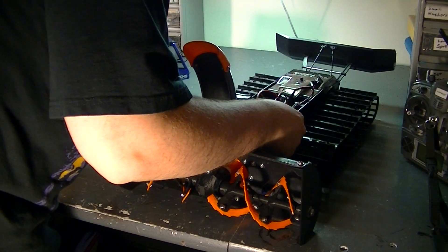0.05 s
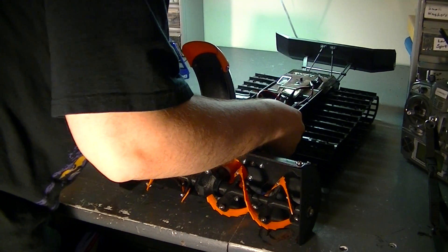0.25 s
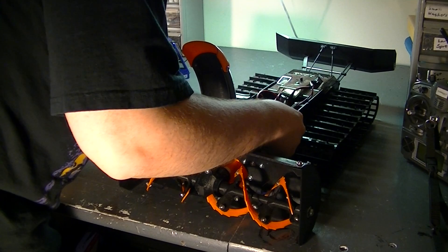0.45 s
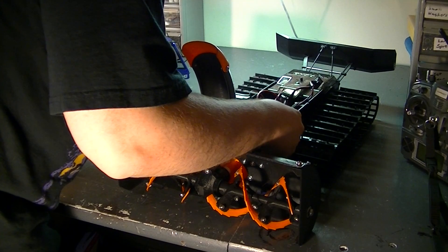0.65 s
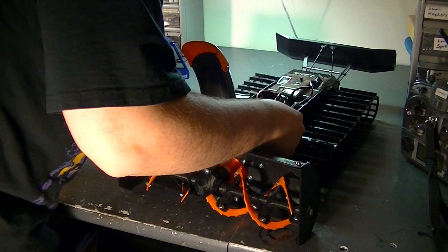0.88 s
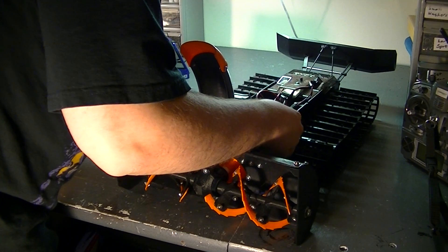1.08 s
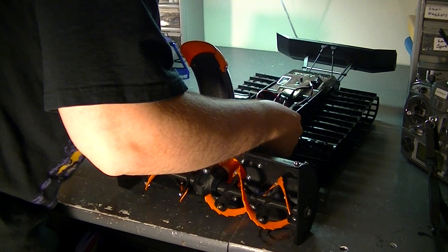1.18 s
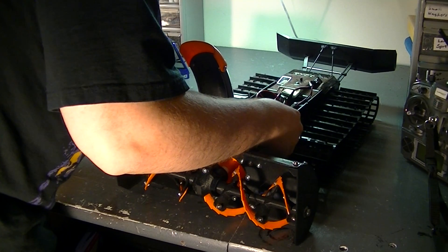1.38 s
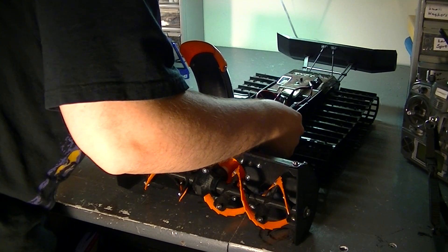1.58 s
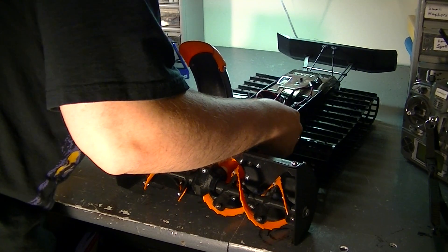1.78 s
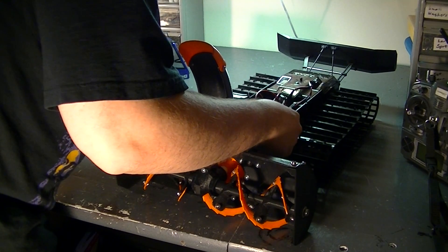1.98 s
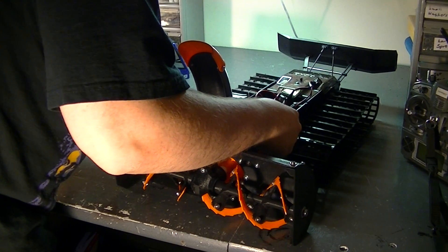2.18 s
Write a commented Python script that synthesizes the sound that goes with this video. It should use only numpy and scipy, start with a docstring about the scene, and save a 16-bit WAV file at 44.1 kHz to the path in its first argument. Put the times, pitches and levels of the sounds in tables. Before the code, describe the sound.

Sharp metallic ratchet clicks run for about two seconds, roughly five a second, as a small model machine is turned by hand. Each cracks and rings briefly. A loud one lands at 0.2 seconds, then they weaken until the other loud snap at 1.4 seconds, followed by softer ones. Between them, loose parts tick lightly and the model knocks faintly on the workbench, over low, quiet room tone.

```python
"""Sharp metallic ratchet snaps, about five a second and uneven in force, in a quiet room. They come from a
small metal model machine turned by hand on a workbench: each snap cracks, rings the frame, bounces off the
bench and dies in the room. Between the snaps, light ticks sound and the model knocks faintly on the bench, over
a low bed of room tone."""
import sys
import numpy as np
from scipy import signal
from scipy.fft import rfft, irfft
from scipy.io import wavfile
from scipy.ndimage import uniform_filter1d

SR = 44100
rng = np.random.default_rng(int(sys.argv[2]) if len(sys.argv) > 2 else 0)


def to_wav(s):
    """Save 16-bit WAV."""
    ch = np.atleast_2d(s).T  # columns
    pcm = np.round(np.clip(ch, -1, 1) * 32767)  # PCM
    wavfile.write(sys.argv[1], SR, pcm.astype(np.int16))


N = 99225
RING_S, LEAD_S = 0.6, 0.1  # length of each hit with its tail; pre-roll before time zero
BUILD_S = 0.0026  # time constant of the ringing as it spreads through the frame


def undb(db):
    """Decibels to gain."""
    return 10 ** (np.asarray(db) / 20)


def decay(t, t60):
    """An exponential tail that falls 60 dB in t60 seconds."""
    return np.exp(-np.log(1000) * t / t60)


def curve(hz, points, column=1):
    """A column of a table, read on a log-frequency axis."""
    table = np.array(points, float)
    return np.interp(np.log(np.maximum(hz, 1)), np.log(table[:, 0]), table[:, column])


def colour(x, points, size=4096):
    """Minimum-phase EQ through points of (frequency [Hz], gain [dB])."""
    cepstrum = irfft(curve(np.fft.rfftfreq(size, 1 / SR), points) * np.log(10) / 20)
    cepstrum[1:size // 2] *= 2  # folded forward, so nothing rings ahead of an attack
    cepstrum[size // 2 + 1:] = 0
    impulse = irfft(np.exp(rfft(cepstrum)))
    return signal.fftconvolve(x, impulse[None], axes=1)[:, :x.shape[1]]


def shelves(x, treble_db, bass_db=0):
    """Bass and treble shelves: a harder contact is brighter, a softer one duller."""
    return colour(x, [(594, bass_db), (1080, 0), (2120, 0), (7000, treble_db)])


def noise(size, side_db=-17.5, side_top_hz=6500):
    """White noise in a narrow stereo image, narrower still in the treble."""
    mid, side = rng.standard_normal((2, size))
    side = signal.lfilter(*signal.butter(1, side_top_hz, fs=SR), side)
    return mid + undb(side_db) * side * np.array([[1], [-1]])


def dense_ring(t, table, bands=40):
    """Countless close modes: noise in which each band dies at its own rate."""
    hz = np.fft.rfftfreq(len(t), 1 / SR)
    spectrum = rfft(noise(len(t))) * undb(curve(hz, table))
    centres_hz = np.geomspace(100, 16000, bands)
    ring = 0
    for centre, weights in zip(centres_hz, np.eye(bands)):
        band = irfft(spectrum * np.interp(hz, centres_hz, weights), len(t))
        ring += band * decay(t, curve(centre, table, column=2))
    return ring


def add(out, x, start):
    """Mix a sound in at its start time, allowing for the pre-roll."""
    i = max(int((start + LEAD_S) * SR), 0)
    out[:, i:i + x.shape[1]] += x[:, :out.shape[1] - i]


def room_tone(size, level_db=-55.5, waver_db=2.08, waver_samples=4000):
    """A low bed of room noise whose level wavers slightly."""
    # tone of the room's air (frequency [Hz], relative level [dB])
    air_spectrum = [(15, -49), (25, -12), (80, -15.5), (157, -1.5), (344, -2.5), (476, -7.5), (695, -6.5),
                    (754, -3), (1070, -5), (1610, -13), (2110, -9), (2610, -14.5), (3520, -19), (4740, -21),
                    (7110, -27), (14000, -35.5), (16000, -42)]
    air = colour(noise(size), air_spectrum)
    waver = uniform_filter1d(rng.standard_normal(size), waver_samples)
    waver = uniform_filter1d(waver, waver_samples)
    return air / air.std() * undb(level_db + waver_db * waver / waver.std())


def bench_knock(t, hz, t60, rattle_db=-2.5, width_hz=306, rise_s=0.0011):
    """A soft contact with the bench rings one low mode, with a little rattle around it."""
    edges_hz = [max(hz - width_hz / 2, 20), hz + width_hz / 2]
    rattle = signal.sosfilt(signal.butter(2, edges_hz, "band", fs=SR, output="sos"), noise(len(t)))
    ring = np.sin(2 * np.pi * hz * t) + undb(rattle_db) * rattle / rattle.std()
    return ring * (1 - np.exp(-t / rise_s)) * decay(t, t60)


def light_tick(t, crack_db=-4, crack_s=0.0012):
    """A light tick: a brief crack and a short ring."""
    # ring of a light tap (frequency [Hz], level [dB], t60 [s])
    tap_ring = [(150, -56, 0.2), (350, -43.5, 0.25), (580, -33.5, 0.14), (1060, -29, 0.1), (1470, -39, .12),
                (1960, -40, 0.11), (3940, -46.5, 0.13), (8900, -56.5, 0.075), (15000, -80, 0.092)]
    return dense_ring(t, tap_ring, bands=8) * (1 + undb(crack_db) * np.exp(-t / crack_s))


def metal_ring(t):
    """The few modes of the metal parts that sing on after a snap."""
    # lasting modes (frequency [Hz], level [dB], t60 [s])
    modes = [(765.4, -39.5, 0.26), (831, -35.5, 0.21), (946.3, -24, 0.1), (1015, -33.5, 0.22),
             (1286, -31.5, .2), (1486, -39.5, 0.12), (1782, -28, 0.19), (1808, -35, 0.36),
             (2060, -30, 0.21), (2057, -34.5, 0.16), (2216, -37.5, 0.23), (2600, -30, 0.093),
             (3109, -43, 0.28), (3982, -36, 0.15)]
    phases = rng.uniform(0, 2 * np.pi, len(modes))
    ring = sum(undb(db) * np.sin(2 * np.pi * hz * t + phase) * decay(t, t60)
               for (hz, db, t60), phase in zip(modes, phases))
    return (1 - np.exp(-t / BUILD_S)) * ring


def frame_hit(t):
    """The body of a snap: an impact by three short paths, then the ringing frame and the room."""
    # direct path, then bounces off the bench and the housing (delay [s], level [dB], treble [dB])
    paths = [(.0001, -13, -11), (.0015, -2.5, -16.5), (.00245, -2, -14)]
    # tone of the impact (frequency [Hz], gain [dB])
    impact_spectrum = [(100, -24), (450, -10.5), (680, -3.5), (980, 18.5), (1250, 10), (1550, -0.5),
                       (2100, 16), (2700, 10.5), (4400, 6), (7000, 3), (10000, -9), (15000, -32)]
    # dense ringing of the frame (frequency [Hz], level [dB], t60 [s])
    frame_ring = [(120, -52, 0.14), (333, -41, 0.37), (570, -30.5, 0.28), (860, -18.5, 0.17),
                  (1070, -15, 0.097), (1400, -18.5, 0.22), (1790, -14, 0.2), (2180, -4, 0.048),
                  (2430, -12.5, 0.11), (4300, -26.5, 0.15), (7400, -30, .16), (9260, -37.5, 0.18),
                  (15000, -53, 0.14)]
    # reverb of the room (frequency [Hz], level [dB], t60 [s])
    room_reverb = [(150, -45, 0.37), (520, -35, 0.27), (1000, -28.5, 0.36), (1970, -27.5, 0.31),
                   (4580, -28.5, 0.3), (7850, -51, 0.29), (15000, -69, 0.21)]
    arrivals = 0
    for delay, db, treble_db in paths:
        pulse = np.zeros((2, len(t)))
        pulse[:, int(delay * SR)] = undb(db)
        arrivals += shelves(pulse, treble_db)
    tail = dense_ring(t, frame_ring) + dense_ring(t, room_reverb)
    return colour(arrivals, impact_spectrum) + (1 - np.exp(-t / BUILD_S)) * tail


def ratchet_snap(t, body, low_cut_hz=190):
    """A fresh gritty crack tops the ringing body; little sounds below about 190 Hz."""
    # crack of the ratchet (frequency [Hz], level [dB], t60 [s])
    crack = [(300, -30.5, 0.024), (1500, -19, 0.09), (3000, -28.5, .035), (4470, -13, 0.02),
             (6500, -25, 0.031), (9700, -25, 0.025), (14800, -49, 0.011)]
    low_cut = signal.butter(3, low_cut_hz, "high", fs=SR, output="sos")
    return signal.sosfilt(low_cut, dense_ring(t, crack, bands=8) + body)


def scene(balance_db=0.08):
    """Snaps ring the same frame over the room tone; ticks and knocks fall between them."""
    # ratchet snaps (time [s], level [dB], treble [dB], bass [dB], metal ring [dB])
    snaps = [(-.022, -8, -5, 4.5, -5), (0.2192, 1.5, -0.5, 1, -2), (.4145, -3.5, -2, 0.5, -4),
             (0.5952, -15, -2.5, -3, -1), (0.7823, -12.5, -4, 7.5, -3.5), (0.9628, -17, -9, 2.5, -5.5),
             (1.1576, -29, -3.5, -4, 2), (1.3848, 0, 2.5, 0, -1), (1.5262, -11.5, -16.5, 1.5, -2),
             (1.699, -22.5, -10, 3, -5), (1.901, -12, -8, 2.5, -2.5), (2.0814, -16, -11.5, -5, -7)]
    # light ticks between the snaps (time [s], level [dB], treble [dB])
    ticks = [(.144, -3.5, -9), (0.387, -7, -4), (.622, 0, -2), (1.002, 0, -3), (1.100, -30, 21),
             (1.168, 1, -21), (1.551, -3, 3), (1.743, -2.5, 2.5), (1.933, -4, 5), (2.116, -3, 1.5),
             (2.171, -14.5, 7)]
    # dull knocks of the model shifting on the bench (time [s], level [dB], pitch [Hz], t60 [s])
    knocks = [(.364, -37, 1070, 0.032), (0.646, -54.5, 349.6, 0.49), (1.154, -41, 955, 0.067),
              (1.206, -52, 298, 0.22), (1.286, -44, 860, 0.14), (1.824, -44, 692, 0.11),
              (1.83, -49.5, 295.3, 0.34)]
    t = np.arange(int(RING_S * SR)) / SR
    lead = int(LEAD_S * SR)
    mix = room_tone(N + lead)
    ring, hit = metal_ring(t), frame_hit(t)
    for start, db, treble_db, bass_db, ring_db in snaps:
        snap = ratchet_snap(t, hit + undb(ring_db) * ring)
        add(mix, undb(db) * shelves(snap, treble_db, bass_db), start)
    for start, db, treble_db in ticks:
        add(mix, undb(db) * shelves(light_tick(t), treble_db), start)
    for start, db, hz, t60 in knocks:
        add(mix, undb(db) * bench_knock(t, hz, t60), start)
    return mix[:, lead:] * undb([[balance_db / 2], [-balance_db / 2]])  # a hair to the left


def record(dry):
    """A steep low-pass trims the very top of the treble."""
    top_hz = 16200
    return signal.sosfilt(signal.ellip(10, 0.1, 80, top_hz, fs=SR, output="sos"), dry)


dry = scene()
out = record(dry)
to_wav(out)
```